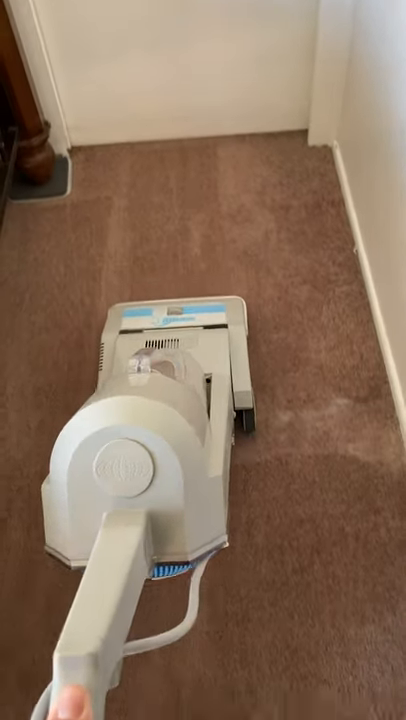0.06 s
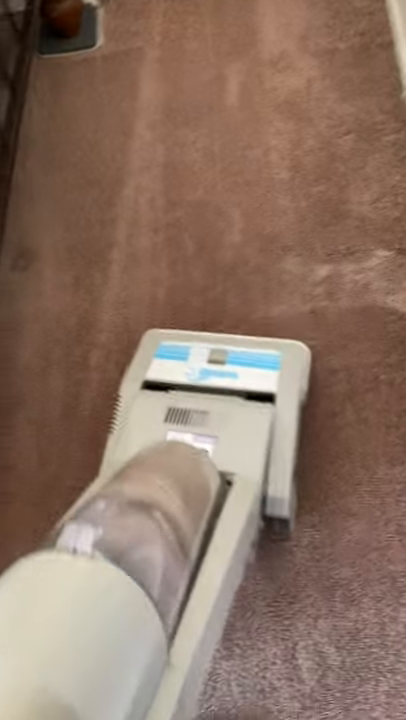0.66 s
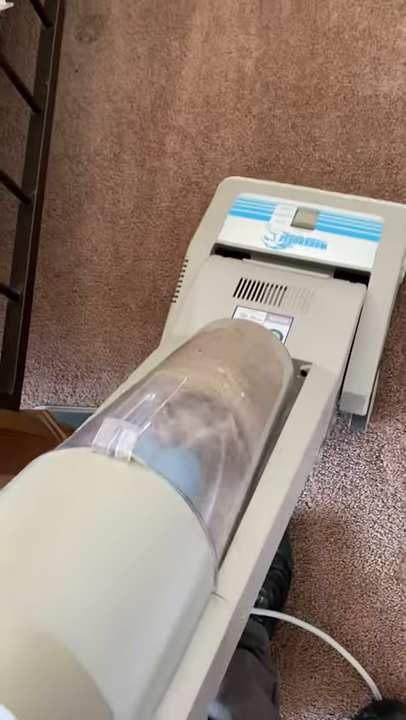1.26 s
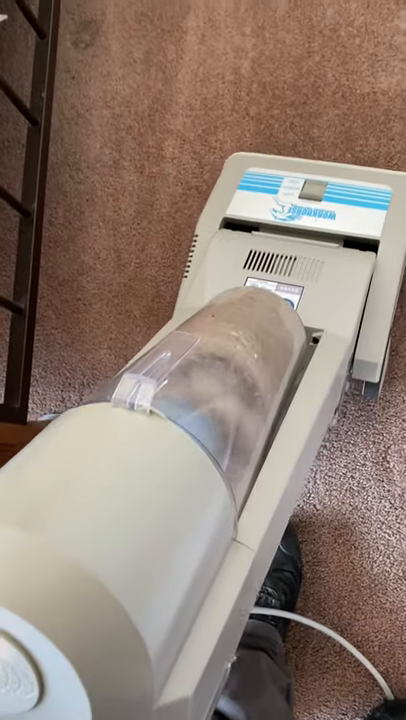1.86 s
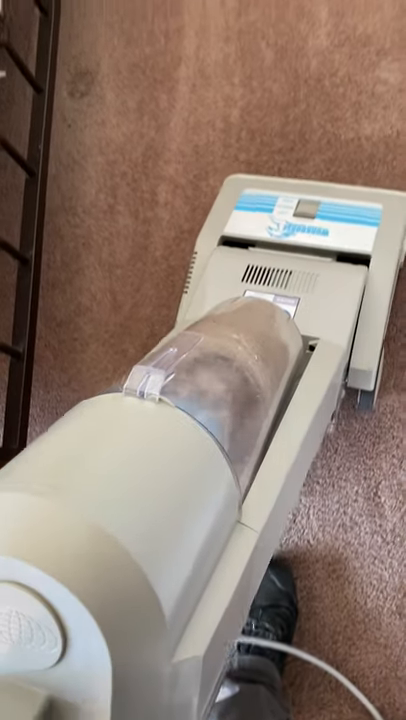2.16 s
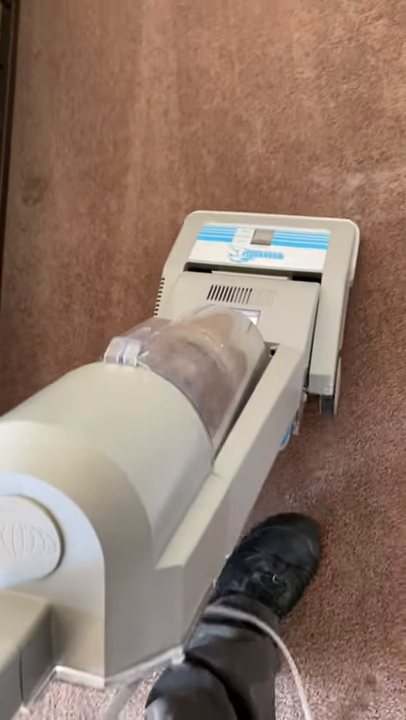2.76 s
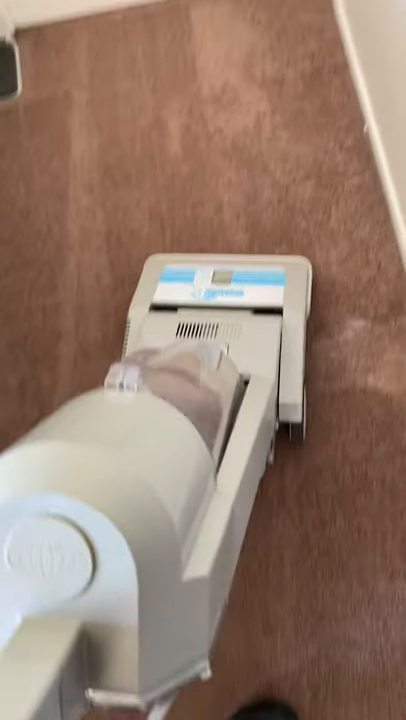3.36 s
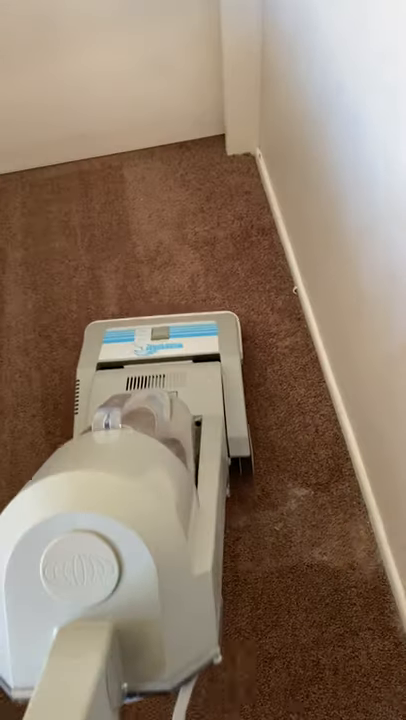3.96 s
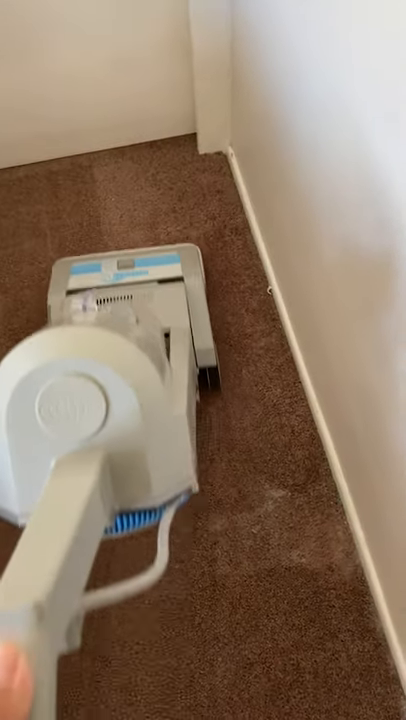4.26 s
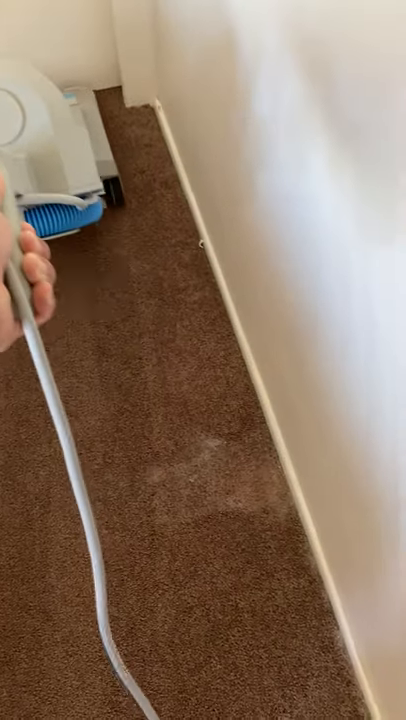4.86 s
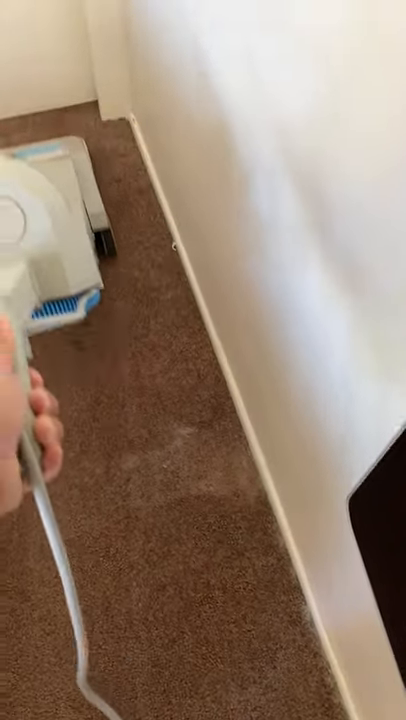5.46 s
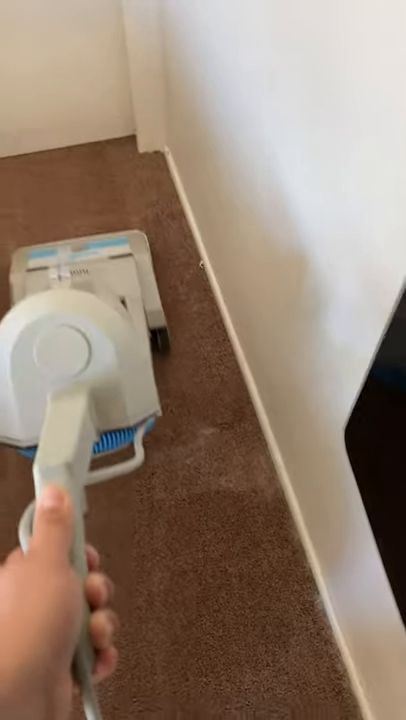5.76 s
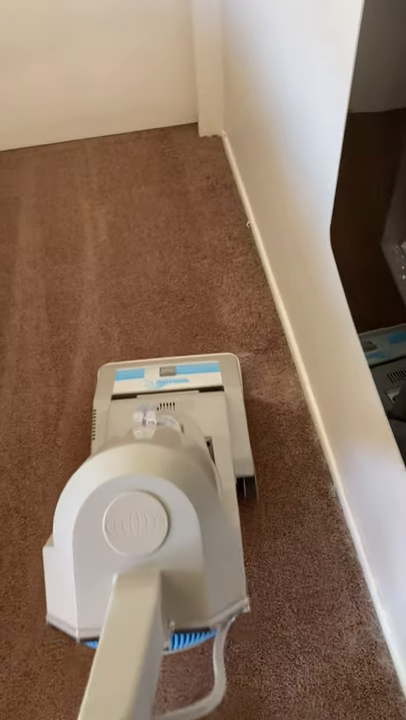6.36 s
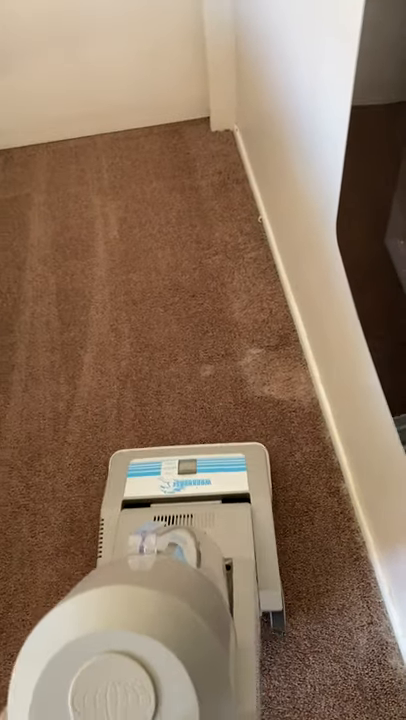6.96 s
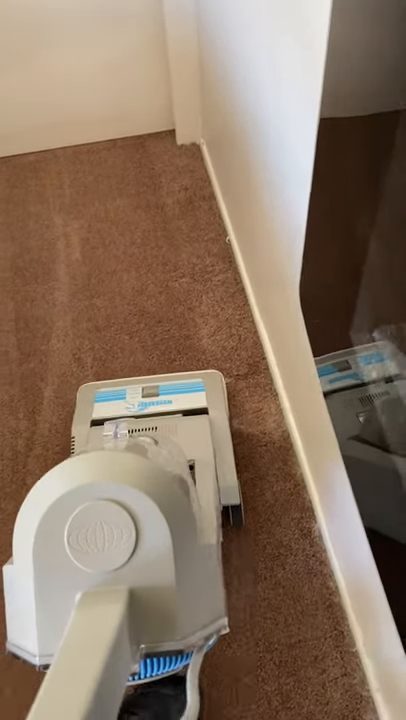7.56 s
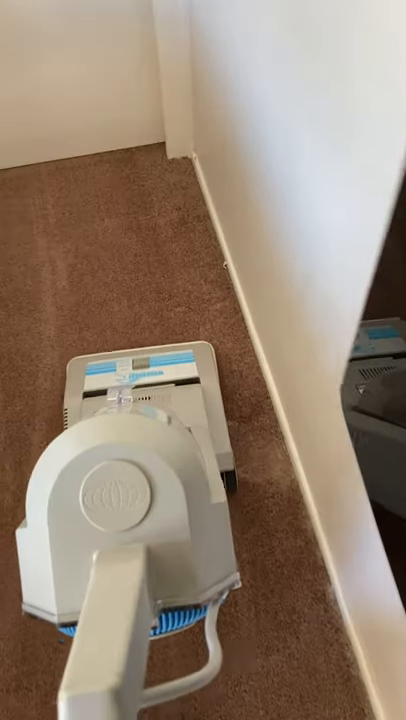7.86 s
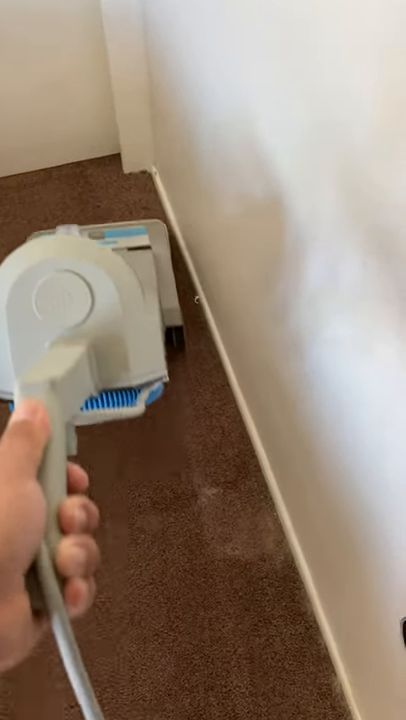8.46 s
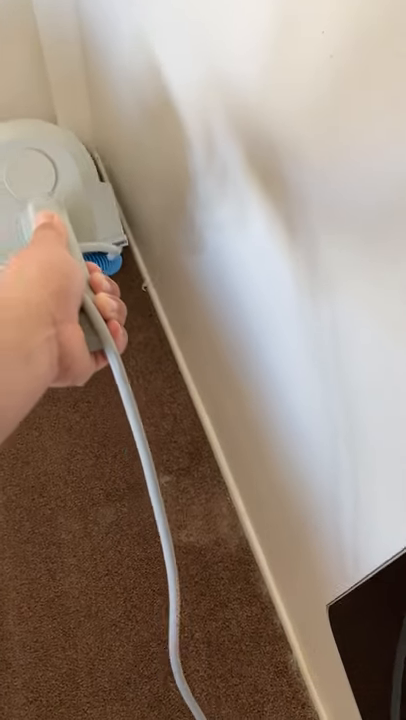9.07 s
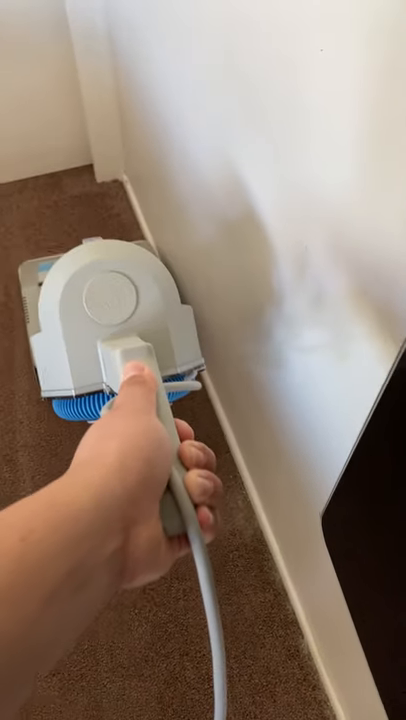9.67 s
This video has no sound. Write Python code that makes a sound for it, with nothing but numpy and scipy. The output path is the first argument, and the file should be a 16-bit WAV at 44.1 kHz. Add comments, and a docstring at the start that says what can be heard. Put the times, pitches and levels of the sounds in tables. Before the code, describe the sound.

Heard from its handle, an upright vacuum is pushed back and forth over bedroom carpet, its rushing suction and whining motor never stopping. A tiny plastic squeak comes first, then a faint knock. Bits of grit crackle in the duct, and the head hits the skirting board with a low thud as the roar briefly grows. Scratchy hiss rises twice along the carpet's edge, while the nearby walls softly colour the noise.

```python
"""A steady roar of air with a motor humming and whining over it: an upright vacuum cleaner, heard from
its handle as it is pushed to and fro over bedroom carpet. Its distance from two walls sets the
loudness of each air noise and the sweep of the echoes. A plastic joint squeaks once, grit ticks up
the nozzle, the head thuds against the skirting board, and air leaks at the carpet's edge."""
import sys
import numpy as np
from scipy import signal
from scipy.fft import rfft, irfft, next_fast_len
from scipy.io import wavfile

SR = 44100
rng = np.random.default_rng(int(sys.argv[2]) if len(sys.argv) > 2 else 0)


def store_wav(level_fs):
    """Save 16-bit WAV to argv[1]."""
    pcm = np.round(np.clip(np.atleast_2d(level_fs), -1, 1) * 32767)
    wavfile.write(sys.argv[1], SR, pcm.T.astype(np.int16))


N = 428206
TIME = np.arange(N) / SR
BIN_HZ = np.maximum(np.fft.rfftfreq(next_fast_len(N), 1 / SR), 1)

# The cleaner's strokes. Each row: time in seconds, then in metres the distance to the wall ahead,
# the distance to the side wall and the extra path of the floor echo.
PATH = [(0, .8, .39, .245), (.3, .87, .405, .222), (.7, .92, .467, .183), (1.5, .94, .475, .22),
        (2.6, 1, .46, .234), (3, .89, .41, .265), (3.4, .68, .39, .243), (3.9, .54, .356, .196),
        (4.3, .37, .3, .147), (5, .17, .21, .108), (5.5, .24, .21, .1), (5.9, .46, .23, .134),
        (6.4, .82, .285, .187), (6.8, .92, .3, .212), (7.2, .91, .31, .189), (7.7, .77, .3, .152),
        (8.15, .52, .295, .13), (8.6, .26, .23, .074), (9.7, .26, .195, .072)]
# How alike left and right sound. Each row: frequency in Hz, shared part of the power from 0 to 1.
LIKENESS = [(200, .999), (420, .992), (650, .92), (950, .77), (1300, .85), (1900, .9), (3600, .58),
            (7000, .82), (9000, .99), (11000, .985), (13000, .8)]


def air():
    """The low roar spreads all round and returns from the wall; the higher jets blow at the floor."""
    # Colours of the three lower air noises. Each row: frequency in Hz, relative level in dB.
    roar_colour = [(25, -44), (36, -32.5), (52, -17.5), (75, -13), (92, -16), (120, -7), (200, -6.5),
                   (270, -3), (330, 0.4), (430, -5), (520, -10.5)]
    rush_colour = [(520, -1.6), (700, -4), (900, -2.5), (1200, -5), (1550, -7.3)]
    exhaust_colour = [(1550, 3.5), (1750, -1), (2000, -0.5), (2500, 1.3), (3100, 0.9), (3500, -3)]
    # High hiss of air, with a deep gap near 11 kHz. Same columns.
    gapped_hiss = [(3500, 6.5), (4450, 3.5), (4850, -0.6), (5400, 1), (6600, -0.1), (8000, -4.5),
                   (11000, -47), (12500, -3), (15500, -5.5)]
    roar = turbulence(roar_colour, flutter_db=.3, wall=.34, rear=-.28)
    rush = turbulence(rush_colour, flutter_db=.3, side=.21, floor=.28)
    exhaust = turbulence(exhaust_colour, flutter_db=.3, side=.08, floor=.29)
    hiss = turbulence(gapped_hiss, flutter_db=.4, side=.05, floor=.08)
    pressed_db = 4 * bell(TIME - 5.14, width=.63)  # the head presses against the skirting board
    ahead_m = in_time(PATH)[0]
    beam_db = 1.5 * bell(ahead_m - .48, width=.52)  # here the exhaust vent points at the handle
    return (roar * place_gain(-22.5 + pressed_db, ahead_db_per_m=-.7, side_db_per_m=-5)
            + rush * place_gain(-29.5, ahead_db_per_m=-3.5, side_db_per_m=11.5)
            + exhaust * place_gain(-33.5 + beam_db, ahead_db_per_m=-4.5, side_db_per_m=35)
            + hiss * place_gain(-39.5, ahead_db_per_m=-2, side_db_per_m=14))


def turbulence(colour, flutter_db, wall=0, rear=0, side=0, floor=0):
    """Stereo air noise, coloured by cavities and combed by moving echoes that each bounce twice."""
    # Peaks and dips of the shell, dust bin and ducts. Each row: centre in Hz, width in Hz, gain in dB.
    cavities = [(300, 69, 2), (350.3, 27, -9), (420, 27, -3), (622, 47, 4.5), (946, 70, -3),
                (1530, 70, 0.5), (1980, 220, 5.5), (2490, 140, 3.5)]
    cavity_db = sum(db / (1 + (2 * (BIN_HZ - hz) / width) ** 2) for hz, width, db in cavities)
    low_hz, high_hz = colour[0][0], colour[-1][0]
    rolloff = np.sqrt((1 + (low_hz / BIN_HZ) ** 20) * (1 + (BIN_HZ / high_hz) ** 20))
    gain = from_db(at_hz(colour, BIN_HZ) + cavity_db) / rolloff
    alike, pickup = at_hz(LIKENESS, BIN_HZ), ports(BIN_HZ)
    direct = shaped(rng.standard_normal(N), gain * np.sqrt(alike) * pickup)
    diffuse = shaped(rng.standard_normal((2, N)), gain * np.sqrt(1 - alike) * abs(pickup))
    jet = direct + diffuse
    reflected = shaped(jet, 1 / (1 + (93 / BIN_HZ) ** 2))  # the deepest bass does not reflect
    for delay_ms, share in zip(echo_delays_ms(), (wall, rear, side, floor)):
        if share:
            jet = jet + share * echo(reflected, delay_ms) + share ** 2 / 2 * echo(reflected, 2 * delay_ms)
    return jet / rms(jet.mean(axis=0)) * from_db(flutter_db * drift(rate_hz=16))


def motor():
    """Rotor unbalance hums once a turn, the fan sings at multiples of that, the belt whines between."""
    # Motor speed. Each row: time in seconds, revolutions per second.
    speed_curve = [(0, 388), (1, 387.2), (2.7, 383.4), (5.3, 385.3), (6.3, 383.3), (8.4, 381.6),
                   (9.7, 382.5)]
    # Level rides of the motor's tones. Each row: time in seconds, level in dB.
    hum = [(0.05, -37), (0.4, -22.5), (0.85, -24.5), (1.05, -29.5), (1.65, -31), (2, -27), (3.25, -26),
           (3.6, -30.5), (4.25, -21.5), (4.75, -24), (5.1, -35), (5.7, -22), (6.15, -28.5), (7.75, -26.5),
           (8.6, -19.5), (9.7, -22)]
    belt_whine = [(0.1, -31.5), (0.7, -49), (1, -33), (2.6, -38), (2.9, -33.5), (3.39, -33.5), (3.58, -65),
                  (4.4, -38.5), (5.9, -60), (6.6, -43.5), (8.2, -41.5), (8.45, -37), (9.66, -38)]
    second = [(0, -56), (.45, -41), (1.7, -36), (2.2, -42), (2.7, -34.5), (3.4, -42.5), (7.1, -48),
              (8.1, -39.5), (9.3, -33.5), (9.7, -42)]
    third = [(.4, -54), (1, -39), (1.65, -34), (2.1, -53.5), (5.999, -46.5), (6.9, -41), (7.9, -52),
             (8.7, -41), (9.7, -41.5)]
    fourth = [(1.1, -45.5), (2.2, -43), (2.8, -52), (4.55, -43.5), (7.8, -52.5), (9, -44)]
    blades = [(0, -45), (1.6, -41), (2.05, -35), (2.4, -43.5), (3.3, -39), (3.6, -56.5), (6.3, -46.5),
              (6.8, -58.5), (7.9, -43.5), (8.4, -51.5), (8.7, -42), (9.7, -42)]
    low_whistle = [(0, -51), (1.4, -44.5), (2.05, -60), (2.75, -41), (3.2, -64), (5.15, -48), (6.6, -50.5),
                   (9.7, -49)]
    high_whistle = [(0, -45), (1.9, -43), (2.4, -60), (3.4, -57), (4.9, -44.5), (5.8, -56), (6.8, -48),
                    (7.7, -59), (9, -46), (9.5, -41)]
    # Each row: multiple of the rotation rate, level ride, depth of fading.
    tones = [(1, hum, .06), (2.6045, belt_whine, .22), (2, second, .3), (3, third, .3),
             (4, fourth, .45), (6, blades, .55), (11, low_whistle, .45), (12, high_whistle, .45)]
    speed = in_time(speed_curve)[0] * (1 + .00022 * drift(rate_hz=7.37))
    iron_buzz = from_db(-41) * np.sqrt(2) * np.sin(2 * np.pi * 120 * TIME)  # twice the mains frequency
    return iron_buzz + sum(motor_tone(speed, multiple, in_time(ride)[0], fading)
                           for multiple, ride, fading in tones)


def motor_tone(speed, multiple, level_db, fading):
    """One tone; room echoes add a wandering part, different left and right for short waves."""
    hz = multiple * speed.mean()
    alike = at_hz(LIKENESS, hz)
    knots_s = np.arange(0, N / SR + 1, 1 / 9)
    phasors = rng.standard_normal((3, len(knots_s), 2)) @ [1, 1j] / np.sqrt(2)
    shared, left, right = [np.interp(TIME, knots_s, row) for row in phasors]
    wander = np.sqrt(alike) * shared + np.sqrt(1 - alike) * np.array([left, right])
    field = (1 + fading * wander) / np.sqrt(1 + fading ** 2)
    rotation = np.exp(2j * np.pi * multiple * np.cumsum(speed) / SR)
    return np.sqrt(2) * from_db(level_db) * (field * rotation * ports(hz)).real


def grit(grains_per_s):
    """Grains rattle in the plastic duct; large ones also snap on the nozzle, harder when heavier."""
    # Large bits. Each row: start in seconds, strength in dB.
    large_bits = [(3.491, -20), (3.548, -25), (3.7858, -27), (4.517, -21), (4.535, -24), (4.579, -23),
                  (4.6218, -17), (4.781, -19), (4.8155, -21), (5.057, -21), (5.101, -25), (5.1088, -26),
                  (5.184, -15), (5.237, -24), (5.2645, -25)]
    # Sandy patches of carpet. Each row: middle in seconds, length in seconds, grain strength in dB.
    sandy_patches = [(3.727, 1, -40), (4.66, 0.49, -42), (5.165, 0.47, -41)]
    sizes_db = 4 * np.minimum(rng.exponential(1, N), 3)
    arrivals = rng.random(N) < grains_per_s / SR
    sand = arrivals * swells(sandy_patches) * from_db(sizes_db)
    hits = strikes(large_bits)
    rattle = from_db(10) * crackle(sand + hits / 2, t60=.025, low_hz=9500)
    snap = from_db(9) * crackle(hits ** 1.35, t60=.022, low_hz=2800)
    return shaped(rattle, ports(BIN_HZ)) + shaped(snap, ports(BIN_HZ, slant=.88))


def crackle(clicks, t60, low_hz):
    """Each click starts a bright, fast-dying burst."""
    decay = from_db(-60 / (t60 * SR))
    energy = signal.lfilter([1], [1, -decay ** 2], clicks ** 2 + 1e-18)
    return cut(np.sqrt(energy) * rng.standard_normal(N), low_hz, "high")


def head_bumps(contact_hz):
    """The padded head knocks softly and the floor booms."""
    # Knocks. Each row: start in seconds, strength in dB.
    knocks = [(2.595, -24), (5.003, -8), (5.075, -19), (5.185, -25)]
    # Floor and chassis modes. Each row: frequency in Hz, gain in dB, seconds to fade by 60 dB.
    modes = [(52, -7, 0.76), (62.3, -1, 0.19), (85.4, -7, 0.13), (126, -3.5, 0.074), (308, 0, 0.091)]
    push, boom = cut(strikes(knocks), contact_hz, "low"), 0
    for hz, gain_db, t60 in modes:
        decay, step = from_db(-60 / (t60 * SR)), 2 * np.pi * hz / SR
        ring = signal.lfilter([0, np.sin(step)], [1, -2 * decay * np.cos(step), decay ** 2], push)
        boom = boom + from_db(gain_db) * ring
    return cut(boom, 48, "high", order=8)


def joint_squeak(at_s, length_s, pitch_hz, fall, level_db, octave_db):
    """A plastic joint slips: a short falling note with a strong octave."""
    progress = np.clip((TIME - at_s) / length_s, -2, 2)
    phase = 2 * np.pi * np.cumsum(pitch_hz * (1 - fall * progress)) / SR
    note = np.sin(phase) + from_db(octave_db) * np.sin(2 * phase)
    return from_db(level_db) * bell(progress, width=1) * note


def edge_leak():
    """Air leaks past the nozzle along the carpet's edge: a narrow, scratchy hiss."""
    # Colour of the leak. Each row: frequency in Hz, relative level in dB.
    colour = [(3550, -5.5), (3900, 1), (4400, -3.5), (4800, -12), (5500, -11.5)]
    # Passes along the edge. Each row: middle in seconds, length in seconds, level in dB.
    passes = [(4.818, 2.1, -40.5), (9.113, 3.8, -45.5)]
    return turbulence(colour, flutter_db=2, side=.14) * swells(passes)


def bedroom(x, echoes):
    """Furniture scatters the shorter waves; each path grows or shrinks as the cleaner moves."""
    scattered, wall_ms = cut(x, 500, "high"), echo_delays_ms()[0]
    for delay_ms, (slope, polarity) in zip(np.geomspace(7, 36, echoes), rng.uniform(-1, 1, (echoes, 2))):
        x = x + .12 * np.sign(polarity) * echo(scattered, delay_ms + .5 * slope * wall_ms)
    return x


def place_gain(mid_stroke_db, ahead_db_per_m, side_db_per_m):
    """Loudness follows the distances from the two walls."""
    ahead_m, side_m, _ = in_time(PATH)
    return from_db(mid_stroke_db + ahead_db_per_m * (ahead_m - .6) + side_db_per_m * (side_m - .35))


def echo_delays_ms():
    """Delays off the wall ahead (from the cleaner's front, then its rear), the side wall and the floor."""
    ahead_m, side_m, floor_m = in_time(PATH)
    rear_detour_m, sound_m_per_s = .89, 343
    paths_m = np.array([2 * ahead_m, 2 * ahead_m + rear_detour_m, 2 * side_m, floor_m])
    return 1000 * paths_m / sound_m_per_s


def echo(x, delay_ms):
    """The sound again, over a path whose length changes."""
    earlier = abs(TIME - delay_ms / 1000)
    return np.array([np.interp(earlier, TIME, channel) for channel in x])


def ports(hz, slant=1):
    """Complex gains of the two microphone ports; the left leads, more so at a greater slant."""
    # Each row: frequency in Hz, left level over right in dB.
    balance = [(150, 0), (380, -1), (550, 1.2), (850, 4.2), (1500, .6), (2100, 0), (2500, -2.4), (3300, .3),
               (4400, -2.6), (6000, 0)]
    # Each row: frequency in Hz, left phase lead in radians at a slant of 1.
    lead = [(300, 0), (2000, .15), (2400, .9), (3300, 1.7), (6000, 1.7), (8700, 3.05), (11300, 3.25),
            (15500, 5.1)]
    side = np.array([[.5], [-.5]])
    return from_db(side * at_hz(balance, hz)) * np.exp(1j * side * slant * at_hz(lead, hz))


def strikes(rows):
    """One click for each row of start in seconds and level in dB."""
    clicks = np.zeros(N)
    for start_s, level_db in rows:
        clicks[round(start_s * SR)] += from_db(level_db)
    return clicks


def swells(rows):
    """A gain curve with one hump for each row."""
    return sum(from_db(level_db) * bell(TIME - at_s, length_s) for at_s, length_s, level_db in rows)


def bell(offset, width):
    """A smooth hump, 1 at zero offset."""
    return np.exp(-(2 * np.clip(offset / width, -3, 3)) ** 2)


def drift(rate_hz):
    """A slow random wobble with rms 1."""
    slow = shaped(rng.standard_normal(N), 1 / (1 + (BIN_HZ / rate_hz) ** 4))
    return slow / rms(slow)


def shaped(x, response):
    """Filter by a response given at every frequency bin."""
    return irfft(rfft(x, next_fast_len(N)) * response, next_fast_len(N))[..., :N]


def cut(x, hz, kind, order=2):
    """Butterworth low- or high-pass."""
    return signal.sosfilt(signal.butter(order, hz, kind, fs=SR, output="sos"), x + 1e-18)


def in_time(rows):
    """The columns of a curve at every sample."""
    seconds, *columns = np.transpose(rows)
    return [np.interp(TIME, seconds, column) for column in columns]


def at_hz(points, hz):
    """Read a table on a log-frequency axis."""
    points_hz, values = np.transpose(points)
    return np.interp(np.log(hz), np.log(points_hz), values)


def from_db(db):
    """Decibels to gain."""
    return 10 ** (np.asarray(db) / 20)


def rms(x):
    """Root mean square."""
    return np.sqrt(np.mean(x ** 2) + 1e-20)


def scene():
    """The running cleaner and what it meets on the carpet."""
    ticks = grit(grains_per_s=90)
    squeak = joint_squeak(at_s=.79, length_s=.032, pitch_hz=1158, fall=.06, level_db=-21.5, octave_db=-1)
    thuds = head_bumps(contact_hz=220)
    return bedroom(air() + edge_leak(), echoes=8) + motor() + ticks + thuds + squeak


def record(dry):
    """The highest treble is cut steeply."""
    cutoff_hz = 15850
    return signal.sosfilt(signal.ellip(12, .1, 80, cutoff_hz, fs=SR, output="sos"), dry)


dry = scene()
out = record(dry)
store_wav(out)
```